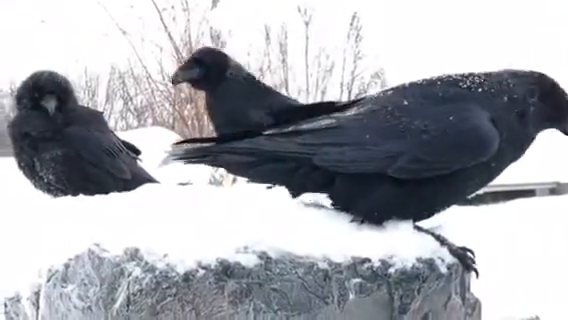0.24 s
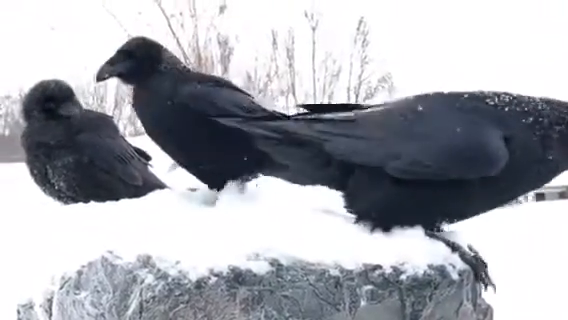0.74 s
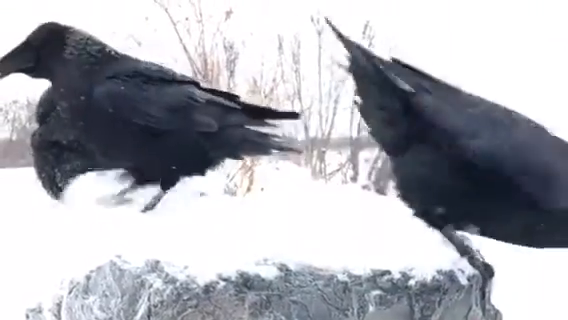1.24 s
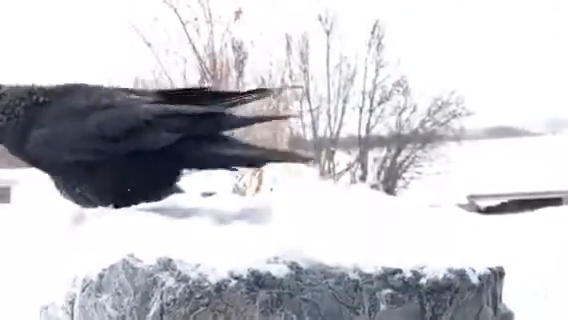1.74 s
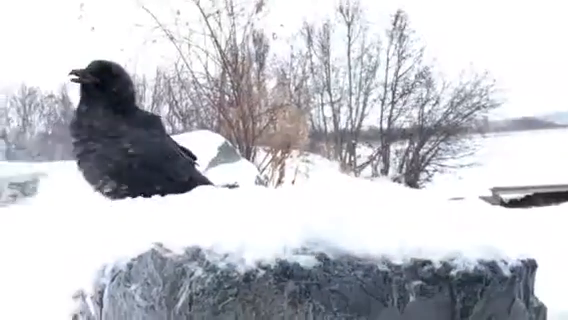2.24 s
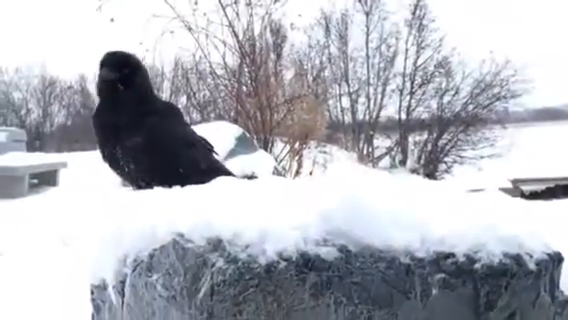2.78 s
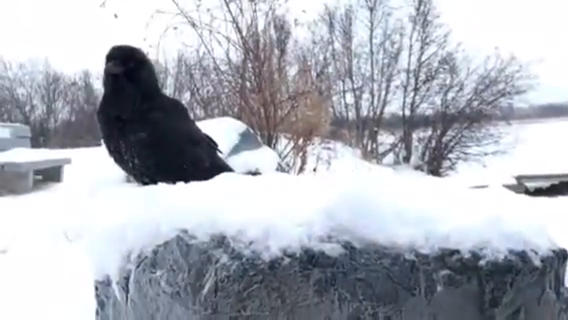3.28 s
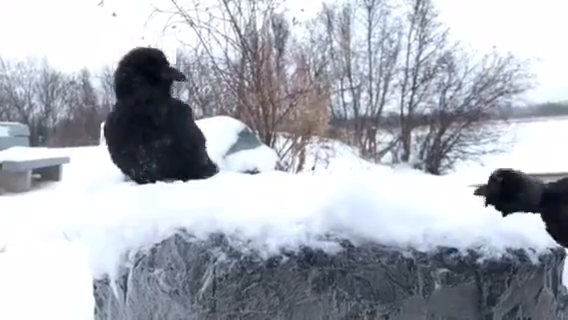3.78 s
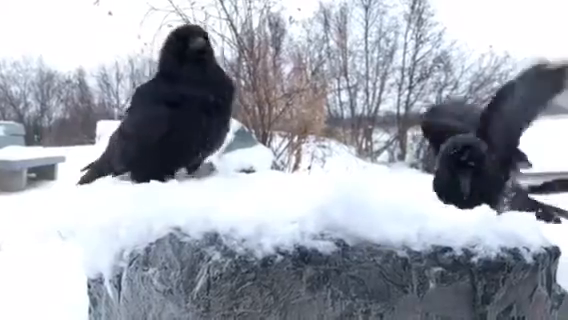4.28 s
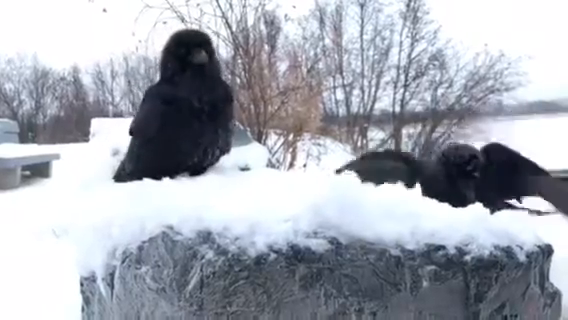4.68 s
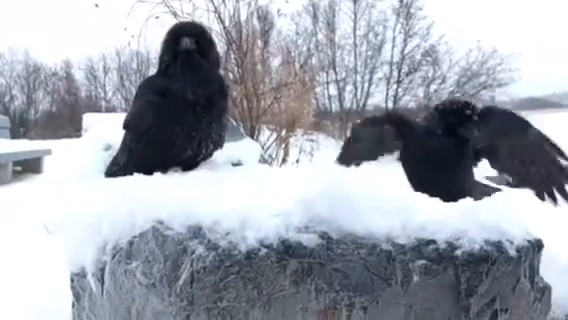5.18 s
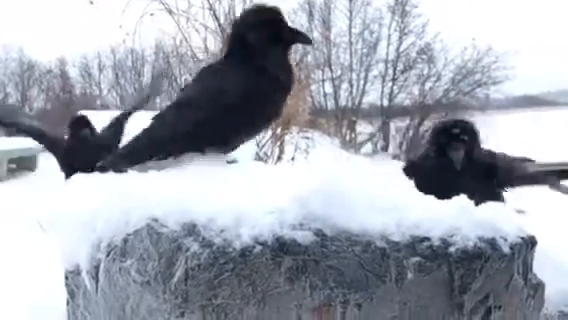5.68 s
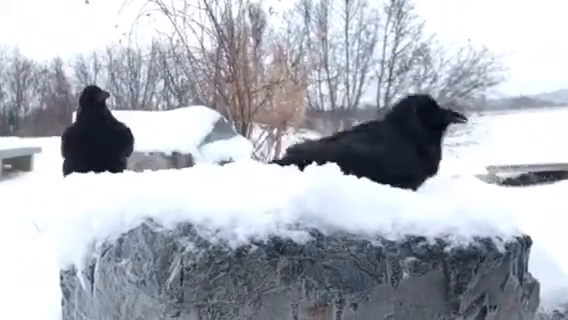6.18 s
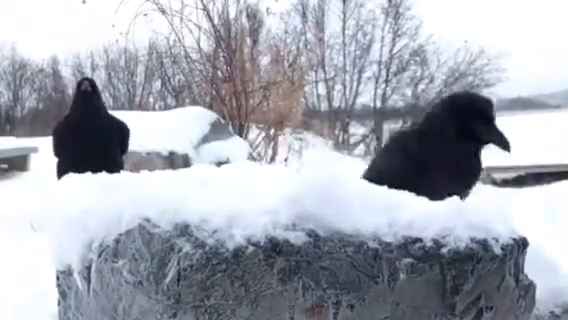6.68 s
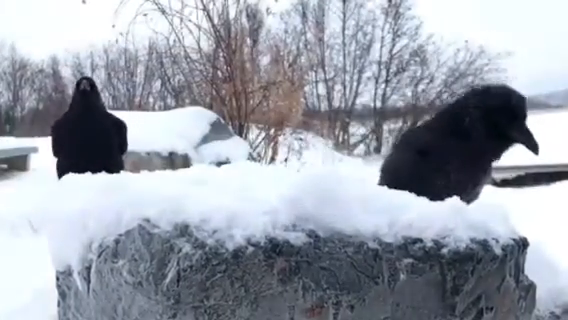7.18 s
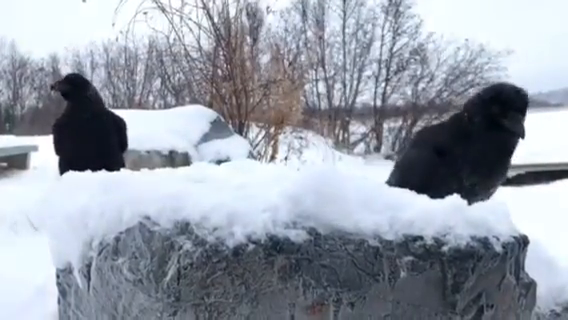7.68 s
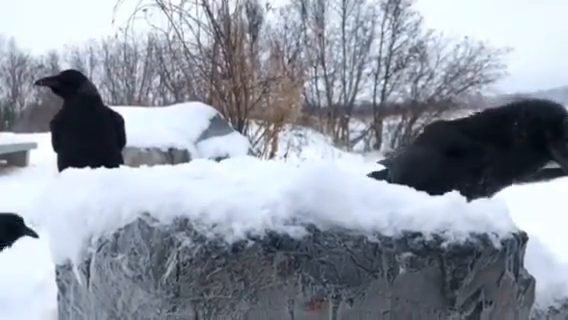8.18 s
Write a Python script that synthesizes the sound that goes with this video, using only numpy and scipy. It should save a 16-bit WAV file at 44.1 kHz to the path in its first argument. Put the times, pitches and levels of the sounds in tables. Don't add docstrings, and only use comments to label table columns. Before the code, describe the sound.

Outdoors in snow, close to the microphone, feathers rustle and crust crunches over low lumpy wind rumble and a faint far engine idling. A loud, rasping croak breaks in, followed by a flurry of steps and claw ticks, then three short clear raven yelps spaced out. Afterwards only rustles, soft crunches and rumble remain. The sound is dry, with almost no echo.

```python
import sys
import numpy as np
from scipy import signal
from scipy.fft import rfft, irfft, next_fast_len
from scipy.io import wavfile
from scipy.ndimage import uniform_filter1d, map_coordinates

SR = 44100
rng = np.random.default_rng(int(sys.argv[2]) if len(sys.argv) > 2 else 0)


def digitize_waveform(pressure):
    field = np.atleast_2d(pressure).T
    bounded = np.clip(field, -1, 1)
    quanta = np.round(bounded * 32767).astype(np.int16)
    wavfile.write(sys.argv[1], SR, quanta)


def attenuation_scalar(level_db):
    decades = np.asarray(level_db, float) / 20
    return 10 ** decades


N = 371763
T = np.arange(N) / SR


def unit(x):
    return x / np.sqrt(np.mean(x ** 2) + 1e-20)


def slowly(shape):
    coarse = T[::16]
    return np.interp(T, coarse, shape(coarse))


def curves(rows, smooth=.001):
    s, *columns = np.transpose(rows)
    width = max(1, int(smooth * SR))
    return [uniform_filter1d(np.interp(T, s, column), width) for column in columns]


def wobble(rate):
    knots = rng.standard_normal(int(N * rate / SR) + 4)
    return slowly(lambda t: map_coordinates(knots, [t * rate]))


def noise(spectrum):
    m = next_fast_len(N + 8192)
    hz, db = np.transpose(spectrum)
    log_hz = np.log(np.fft.rfftfreq(m, 1 / SR) + 1)
    gain = attenuation_scalar(np.interp(log_hz, np.log(hz + 1), db))
    return unit(irfft(rfft(rng.standard_normal(m)) * gain, m)[:N])


def turns(hz):
    return 2 * np.pi * np.cumsum(hz) / SR


def inside(rows):
    return np.clip(np.minimum(T - rows[0][0], rows[-1][0] - T) / .002, 0, 1)


def bumps(rows, late, width):
    return slowly(lambda t: sum(attenuation_scalar(db) * np.exp(-((t - s - late) / width) ** 2) for s, db in rows))


def bouts(rows):
    def envelope(t):
        total = 0
        for s, held, db, swell, fade in rows:
            away = np.maximum((s - t) / swell, (t - s - held) / fade).clip(0)
            total = total + attenuation_scalar(db - 20 * away)
        return total
    return slowly(envelope)


def engine():
    cycle_hz = 5.832
    # multiple of the cycle rate, level in dB
    hum_tones = [(5.14, -63), (8, -65), (10.3, -66.5), (15.5, -63.5), (17, -65), (20, -61.5), (24, -70.5),
                 (24.95, -62), (32, -70), (36, -75.5)]
    # place in the cycle (0-1), width in cycles, level in dB
    knock_rows = [(.17, .03, -4), (.25, .03, 0), (.5, .02, -3), (.55, .03, -3), (.77, .02, -9),
                  (.93, .03, -3), (.99, .02, -6)]
    # frequency in Hz, density in dB per Hz
    casing = [(760, -43), (840, 4), (925, 8), (965, -15), (1100, -37.5)]
    # frequency in Hz, density in dB per Hz
    tappet = [(1200, -26), (1500, -8), (1750, 7), (2400, -17), (3000, -30)]

    def hum(t):
        total = 0
        for order, db in hum_tones:
            sway_db = 2.2 * wobble(3)[::16]
            cycle = turns(cycle_hz * (1 + 0.00406 * wobble(1.5)))[::16]
            total = total + attenuation_scalar(db + 1.5 + sway_db) * np.cos(order * cycle)
        return total

    def bump(t, at, width):
        from_peak = (t * cycle_hz - at + .5) % 1 - .5
        return np.exp(-(from_peak / width) ** 2)

    knocks = slowly(lambda t: sum(attenuation_scalar(db) * bump(t, at, width) for at, width, db in knock_rows))
    ticking = attenuation_scalar(-57.5) * bump(T, .85, width=.018) * noise(tappet)
    return slowly(hum) + attenuation_scalar(-58) * knocks * noise(casing) + ticking


def background():
    # time in seconds, level in dB
    air_level = [(0.0, -67), (0.164, -51), (0.946, -55), (1.3, -51.5), (3.08, -56), (3.84, -51), (4.6, -56),
                 (6.63, -48.5), (7.3, -54.5), (8.43, -52)]
    # frequency in Hz, density in dB per Hz
    rumble_colour = [(12, -31.5), (26, -23), (42, -11), (50, -5), (70, -4.5), (97, -2), (127, -13.5),
                     (150, -1.5), (200, -18.5), (269, -21.5), (300, -23), (420, -36), (550, -66),
                     (920, -120)]
    # frequency in Hz, density in dB per Hz
    hiss_colour = [(190, -47), (330, -14), (449, -10.5), (663, -5), (780, -13.5), (900, 0.5), (1080, -1.5),
                   (1400, -3.5), (1520, 1), (2140, -8), (2390, -2), (2680, -11), (8220, -17.5),
                   (12700, -22.5), (16000, -24)]
    # time in seconds, gain in dB
    gain_db = [(0, -0.5), (1.55, 0.5), (1.6, -6.5), (1.95, -9.5), (2.15, 0), (2.3, 5), (2.55, 6), (2.9, -3),
               (3.1, 1), (8.43, 0.5)]
    rumble = attenuation_scalar(curves(air_level)[0] - 1 + 0.87 * wobble(12)) * noise(rumble_colour)
    hiss = attenuation_scalar(-59.5 + 0.26 * wobble(3.7)) * noise(hiss_colour)
    return attenuation_scalar(curves(gain_db)[0]) * (rumble + engine() + hiss)


def rustle():
    # start in seconds, held in seconds, level in dB,
    # seconds to swell 20 dB, seconds to fade 20 dB
    plumage = [(.18, .1, -71, .08, .05), (1.05, .01, -63, .45, .25), (1.35, .005, -61, .035, .012),
               (1.47, .35, -59, .15, .1), (1.894, .1, -65, .02, .5), (2.14, .54, -58.5, .1, .3),
               (2.9, .5, -74, .1, .5), (3.81, .02, -57, .45, .03), (3.87, .015, -57, .012, .03),
               (3.978, .005, -65, .14, .34), (4.2, .05, -59.5, .05, .2), (4.55, .55, -73, .1, .1),
               (4.942, .02, -63, .05, .15), (5.13, .2, -65, .03, .03), (5.36, .34, -66.5, .1, .3),
               (6.03, .44, -62, .15, .08), (6.58, .25, -61, .08, .08), (6.9, .14, -63, .2, .1),
               (7.06, .25, -72, .1, .45), (7.83, .005, -66.5, .18, .015), (8.33, .005, -67.5, .03, .16)]
    # start in seconds, peak in dB, thud against the peak in dB
    steps = [(0.8494, -45, -8), (0.9294, -43, -9), (1.043, -42, -16), (1.7998, -40.5, -11),
             (2.1545, -37, -6.5), (2.2538, -36.5, -4), (2.2887, -36, 1), (2.3605, -35, -13),
             (2.4453, -35.5, 0), (3.1388, -45, -6), (3.3712, -46, -10), (3.7144, -40, -4),
             (3.8167, -29, -21), (4.6847, -40, -12), (4.9394, -44, -2), (5.3557, -43.5, -3),
             (5.3901, -43.5, 0.5), (5.5682, -40, 1), (6.0277, -38, -3.5), (6.096, -38, -6),
             (6.295, -38, -13), (6.5829, -35, -9), (6.798, -35, -10), (6.822, -36, -6),
             (7.0174, -39.5, -16)]
    # time in seconds, peak in dB
    claws = [(1.8995, -55), (2.1168, -34), (2.1312, -32.5), (2.1536, -36.5), (2.2867, -33), (2.3393, -38),
             (2.445, -29.5), (2.4894, -38), (2.6185, -29), (5.4645, -43), (6.4812, -44)]
    # time in seconds, peak in dB
    thumps = [(2.189, -40.5), (2.247, -45.5), (2.289, -46), (2.432, -36), (2.643, -44), (4.722, -39.5),
              (5.219, -45), (5.549, -41), (6.679, -45.5), (6.826, -43)]
    # frequency in Hz, density in dB per Hz
    crunch = [(880, -13.5), (1500, -1), (2690, -5.5), (3450, 0), (5020, -3), (6180, -1), (10500, -6.5),
              (14900, -6.5), (16000, -13)]
    thud = [(150, -120), (250, -2), (500, -6), (1200, -9), (2500, -18.5), (4000, -120)]
    push_colour = [(60, -30), (120, 7), (220, -2), (450, -15), (700, -28)]
    half_step = .017 / 2
    tick_thud_db = -4

    def tick_shape(t):
        return sum(attenuation_scalar(db - 7) * (t > s) * np.exp(-np.abs(t - s) / 0.0033) for s, db in claws)

    ticks = slowly(tick_shape)
    crisp = ticks + bumps([(s, db - 13) for s, db, _ in steps], half_step, half_step)
    dull_steps = bumps([(s, db - 13 + thud_db) for s, db, thud_db in steps], half_step, half_step)
    dull = attenuation_scalar(tick_thud_db) * ticks + dull_steps
    push = attenuation_scalar(-8) * bumps(thumps, late=.015, width=.032)
    grain = attenuation_scalar(2.2 * wobble(300))
    feathers = attenuation_scalar(3 + 2.4 * wobble(30)) * grain * bouts(plumage) * noise(crunch)
    return feathers + grain * crisp * noise(crunch) + dull * noise(thud) + push * noise(push_colour)


def echoes(x):
    t = np.arange(SR // 4) / SR
    tail = unit(rng.standard_normal(len(t)) * attenuation_scalar(-60 * t / .12)) / np.sqrt(len(t))
    return attenuation_scalar(-25) * signal.fftconvolve(x, tail)[:N]


def throat(points, log_hz):
    at_hz, db = np.transpose(points)
    return np.interp(log_hz, np.log(at_hz), db)


def band_swells(t, hz):
    # centre in seconds, half length in seconds, frequency in Hz, gain in dB
    swell_rows = [(1.755, .022, 4000, 15), (1.75, .02, 4900, 10), (1.69, .02, 4400, 6),
                  (1.59, .015, 3200, -4), (1.675, .025, 6600, -8), (1.655, .025, 3100, -6),
                  (1.724, .012, 2400, 11), (1.724, .012, 3200, 7), (1.768, .01, 1600, 8),
                  (2.58, .012, 2550, -9), (2.592, .012, 1750, -4), (2.596, .012, 3550, -10),
                  (2.635, .025, 5500, 9), (2.65, .035, 2780, 8), (2.7, .06, 1880, -4), (2.76, .07, 2780, 5),
                  (2.7, .03, 3770, 7), (2.8, .022, 3700, 5), (2.855, .012, 3900, -5),
                  (4.235, .014, 2650, -15), (4.24, .03, 1850, -4), (4.235, .018, 4500, 8),
                  (4.24, .02, 5600, 8), (4.24, .02, 6600, 5), (4.47, .018, 4500, 5), (4.305, .04, 4900, 8),
                  (4.395, .035, 4870, -11), (4.465, .02, 2720, 2), (4.48, .012, 3400, -12),
                  (4.47, .015, 5300, 5), (4.51, .012, 3900, 10), (4.37, .05, 9000, 6), (4.28, .04, 11700, 6),
                  (5.12, .01, 3100, 8), (5.135, .018, 5000, 4), (5.195, .014, 2730, -5), (5.22, .04, 4560, 6),
                  (5.2, .04, 6000, -7), (5.276, .011, 2740, -12), (5.292, .012, 4400, -12),
                  (5.295, .012, 7100, -10), (5.315, .012, 4700, 7), (5.302, .012, 2550, -6),
                  (5.305, .012, 6500, 7), (5.13, .012, 6400, 5)]
    width = .09
    total = 0
    for s, half, at_hz, db in swell_rows:
        if t[0] < s < t[-1]:
            total = total + db * np.exp(-((t - s) / half) ** 2 - (np.log(hz / at_hz) / width) ** 2)
    return total


def partials(call, rows, resonances, beak_steepness):
    lower = [
        [-1, -1, -1, -1],
        [-.5, -5, -13.5, -16],
        [-.5, -10, -8, -19],
        [-.5, -3, -12, -15],
    ]
    upper = [
        [1, -6.5, -11, -8.5, -14, -27.5, -22, -22],
        [-6.5, -6, -11.5, -19, -27, -28, -40, -45],
        [-7, -11, -11.5, -22, -27, -34, -50, -33, -42],
        [3.5, -4.5, -3.5, -7.5, -26, -19, -40, -34, -39, -39],
    ]
    stretch = .2
    pitch, effort_db, short, beak_db = curves(rows, smooth=.005)
    place = np.log(pitch / (1 + stretch * (short - .5)))
    levels = []
    for k, db in enumerate(lower[call]):
        filtered = throat(resonances, place + np.log(k + 1)) + beak_db * (k / 3) ** beak_steepness
        levels.append(effort_db + db + filtered)
    return pitch, levels + [levels[-1] + db for db in upper[call]]


def flutter(flutter_hz, depth):
    beat = turns(flutter_hz * (1 + 0.068 * wobble(25)))
    return 1 + depth * (np.sin(beat) - 0.38 * np.sin(2 * beat)), beat


def voice(call, rows, pitch, levels, bend, beat, shake_db, jitter, low):
    chop_shares = [
        [1, 1, 1, 1, 1, 1, 1, 1, 1, 1],
        [.3, .3, .5, .7, .8, .8, .8, .8, .8, .8],
        [.15, .7, .25, .9, .9, .9, .8, .6, .6, .3, .6],
        [.9, .5, .2, .9, .9, .9, .8, .8, .8, .8, .8, .8],
    ]
    grit_depth = (1.8, 1.5, 1.5, 1.6)
    pitch = uniform_filter1d(pitch, int(0.011 * SR))
    slack = np.clip(1 - pitch / pitch.max(), 0, .15)
    phase = turns(pitch * bend * (1 + jitter * (1 + 28 * slack) * wobble(300)))
    gate = inside(rows)
    on, stack = gate > 0, np.zeros(N)
    chop = [0, 0, *chop_shares[call]]

    def chance(rate):
        return map_coordinates(rng.standard_normal(rate), [(T[on] - rows[0][0]) * rate])

    for k, db in enumerate(levels, 1):
        depth_db = shake_db * (low * min(k, 3) + chop[k - 1])
        shake = depth_db * (np.sin(beat[on] + 0.54 * k) + .5 * chance(rate=45))
        grit = grit_depth[call] * chance(rate=500) / (1 + (4.5 / k) ** 6)
        level = db[on] + shake + grit + band_swells(T[on], k * pitch[on])
        stack[on] += attenuation_scalar(level) * np.cos(k * phase[on] - 0.23 * (k - 1) * (k - 2))
    leak = np.sqrt(attenuation_scalar(levels[0]) ** 2 + attenuation_scalar(levels[1]) ** 2) * (1 + 25 * slack) * gate
    return np.sqrt(2) * stack * gate, phase, leak


def breath(effort, beat, breath_db):
    # frequency in Hz, density in dB per Hz
    breath_colour = [(650, -64), (950, 4.5), (1300, -0.5), (2300, -11), (3000, -26), (3500, -31),
                     (4500, -8), (7000, -13), (9000, -37), (16000, -48.5)]
    return attenuation_scalar(breath_db + 4.9 * np.sin(beat)) * effort * noise(breath_colour)


def yelp(rows, resonances, flutter_hz, order, depth, shake_db, jitter, low, breath_db):
    bend, beat = flutter(flutter_hz, depth)
    pitch, levels = partials(order, rows, resonances, beak_steepness=1.1)
    tone, phase, effort = voice(order, rows, pitch, levels, bend, beat, shake_db, jitter, low)
    return tone + breath(effort, beat, breath_db), phase, bend, beat


def yelps():
    # time in seconds, pitch in Hz, effort in dB, throat shortening (0-1),
    # beak brightness in dB
    rows_1 = [(2.556, 755, -38, .5, -6), (2.571, 835, -20.5, .5, 5), (2.6, 896, -18, .5, 1),
              (2.69, 946.5, -20, .5, -7), (2.77, 928, -20.5, .45, 3), (2.835, 918.4, -22.5, .58, 3),
              (2.855, 871, -24, .4, 0.5), (2.875, 665, -35, .5, -5), (2.89, 532, -48, .5, -5)]
    rows_2 = [(4.208, 730, -29, .5, -14), (4.229, 893, -17, .4, 0), (4.26, 968, -17, .4, -2.5),
              (4.3, 984, -17, .4, -4), (4.38, 979.4, -19.5, .4, -3), (4.44, 962, -22, .55, 0.5),
              (4.48, 890, -25, .65, 1), (4.505, 691, -31, .5, 3), (4.522, 520, -41, .5, -15)]
    rows_3 = [(5.11, 675, -25, .5, -12), (5.125, 814, -19, .5, 1), (5.142, 869, -16, .7, 2),
              (5.153, 876, -17.5, .1, 2), (5.2, 915, -18.5, .3, 2), (5.283, 917, -20, .3, -1),
              (5.31, 825, -26, .5, 1), (5.33, 640, -33, .5, -2), (5.34, 495, -55, .5, -5)]
    # frequency in Hz, gain in dB
    facing = [(500, -25), (930, .5), (1350, 7), (1850, -4), (2500, 4), (2620, 3), (2800, -12), (3700, -7)]
    turned = [(500, -25), (990, .5), (1350, 12), (1900, -3), (2250, -12), (2650, -20), (2900, -7),
              (3700, -7)]
    breath_levels = (-35, -41, -37)
    # time in seconds, pitch in Hz, level in dB
    other_side = [
        (2.63, 1193, -53),
        (2.656, 1155, -24.5),
        (2.67, 1196, -25),
        (2.696, 1196, -24),
        (2.762, 1162, -28),
        (2.785, 1112, -60),
    ]
    # multiple of the first side, multiple of the second, level in dB
    mixing = [(0, 1, -1.5), (0, 2, -6.5), (1, 1, -12.5), (-1, 2, -16.5), (1, 2, -16.5), (2, 2, -19),
              (2, 1, -27.5), (2, -1, -34), (1, 4, -34)]
    # time in seconds, level in dB
    catches = [(2.579, -50), (4.232, -50), (4.483, -56), (5.113, -52), (5.124, -48), (5.31, -50),
               (5.329, -54)]
    # frequency in Hz, density in dB per Hz
    catch_colour = [(800, -25), (1500, -4), (3000, 0), (6500, -2), (8500, -12), (16000, -20)]

    first, phase, bend, beat = yelp(rows_1, facing, 78, order=1, depth=0.007, shake_db=4.5,
                                    jitter=0.0033, low=0.16, breath_db=breath_levels[0])
    other_hz, other_db = curves(other_side, smooth=.008)
    other = turns(other_hz * bend * (1 + 0.0095 * wobble(300)))
    gate = inside(other_side)
    on = gate > 0
    mixed = sum(attenuation_scalar(db) * np.cos(a * phase[on] + b * other[on] + 0.53 * b * b) for a, b, db in mixing)
    duet = attenuation_scalar(other_db) * gate
    first[on] -= np.sqrt(2) * (duet * attenuation_scalar(1.5 * np.sin(beat)))[on] * mixed
    first += breath(duet, beat, breath_db=-12)
    second = yelp(rows_2, turned, 74, order=2, depth=0.011, shake_db=5.5,
                  jitter=0.00143, low=0.04, breath_db=breath_levels[1])[0]
    third = yelp(rows_3, facing, 72.97, order=3, depth=.0115, shake_db=3.0,
                 jitter=0.0023, low=0.073, breath_db=breath_levels[2])[0]
    return first + second + third + bumps(catches, late=0, width=.004) * noise(catch_colour)


def croak():
    # time in seconds, pitch in Hz, effort in dB, throat shortening (0-1), beak brightness in dB
    rows = [(1.559, 660, -13, .5, -30), (1.570, 712, -11, .5, -1), (1.605, 795, -14.5, .6, 1),
            (1.655, 806, -12, .4, -4), (1.7, 823, -10, .55, -23), (1.725, 805, -10, .5, -40),
            (1.752, 722, -16, .5, -25), (1.77, 510, -25, .7, -5), (1.781, 330, -42, .5, -10)]
    # frequency in Hz, gain in dB
    resonances = [(500, -17), (850, -16), (1100, -14), (1350, 1), (1650, 1), (2000, -17), (2450, -25),
                  (2900, -8)]
    # time in seconds, depth in dB, pop in dB
    breaks = [(1.565, 24, -26), (1.578, 13.5, -23), (1.607, 9, -33), (1.629, 16.5, -16.5),
              (1.656, 20, -19.5), (1.667, 2, -32.5), (1.681, 21.5, -25.5), (1.69, 16, -23.5),
              (1.706, 23, -31), (1.714, 24, -30.5), (1.735, 20, -34), (1.746, 14.5, -28.5)]
    # time in seconds, level in dB
    rasp = [(1.42, -72), (1.465, -54), (1.553, -48), (1.57, -24), (1.695, -23), (1.715, -34), (1.772, -33),
            (1.783, -62), (1.83, -94)]
    # frequency in Hz, density in dB per Hz
    rasp_colour = [(200, -63), (450, -48), (800, -25.5), (1150, -21.5), (1450, 3.5), (1950, -18.5),
                   (2570, -31), (3200, -7.5), (4600, -8), (6500, -21), (7800, -37), (8600, -30),
                   (11100, -40), (16000, -55)]
    pop_colour = [(200, -45), (500, -22), (950, 5), (1250, -3), (2000, -2), (3500, -2.5), (5000, -39.5)]
    sizzle = [(5000, -29.5), (6800, 1.5), (7800, -17), (8800, -5.5), (11000, -10.5), (12000, -15),
              (13000, -14), (16000, -22)]
    dip_per_db = .0044

    def dips(t):
        total = 0
        for s, db, _ in breaks:
            decay = np.where(t < s, .0025, .005)
            total = total + dip_per_db * abs(db) * np.exp(-np.abs(t - s) / decay)
        return total

    def notches(t):
        return sum(-abs(db) * np.exp(-((t - s) / .0014) ** 2) for s, db, _ in breaks)

    sag = 1 - slowly(dips)
    notch_db = slowly(notches)
    pops = bumps([(s, pop_db) for s, _, pop_db in breaks], late=0, width=.0026)
    bend, beat = flutter(80, depth=.006)
    pitch, levels = partials(0, rows, resonances, beak_steepness=2.8)
    tone, phase, _ = voice(0, rows, pitch, levels, bend * sag, beat, shake_db=2.8, jitter=.006, low=.1)
    gate = 1 + 0.38 * np.cos(phase)
    air = attenuation_scalar(curves(rasp)[0] + 2.2 * wobble(70)) * noise(rasp_colour)
    bright_db = -30 - 150 * np.abs(T - 1.572) + 1.7 * wobble(60)
    bright = attenuation_scalar(bright_db) * inside([[1.567], [1.78]]) * noise(sizzle)
    return tone * attenuation_scalar(notch_db) + gate * (air + bright) + pops * noise(pop_colour)


def scene():
    calls = croak() + yelps()
    return (calls + echoes(calls) + rustle() + background())[None]


def low_pass(x):
    return signal.sosfilt(signal.butter(12, 16460, fs=SR, output="sos"), x)


def record(dry):
    m = next_fast_len(N + 8192)
    hz = np.fft.rfftfreq(m, 1 / SR)
    kept = (hz < 15880) * attenuation_scalar(-4 * np.exp(-((hz - 10500) / 600) ** 2))
    mix = irfft(rfft(dry, m) * kept, m)[:, :N]
    return low_pass(mix)


dry = scene()
out = record(dry)
digitize_waveform(out)
```